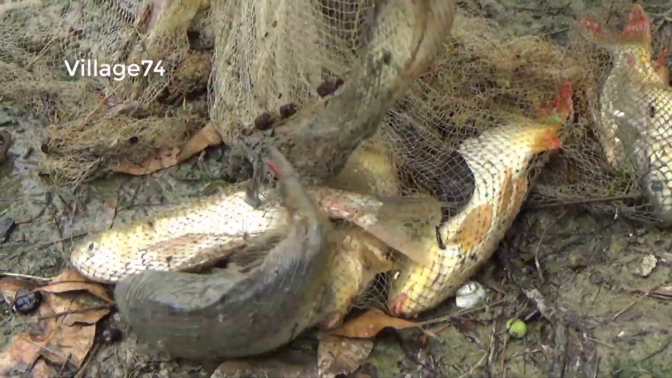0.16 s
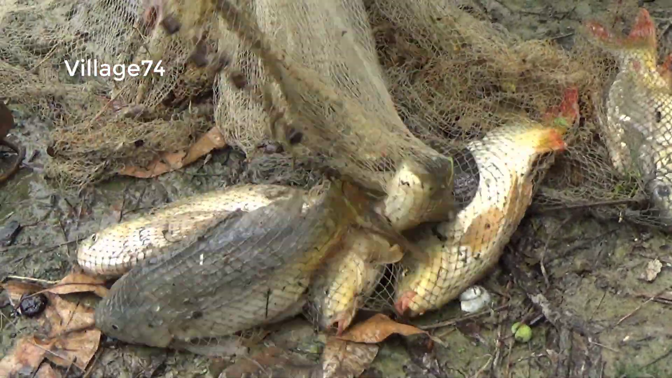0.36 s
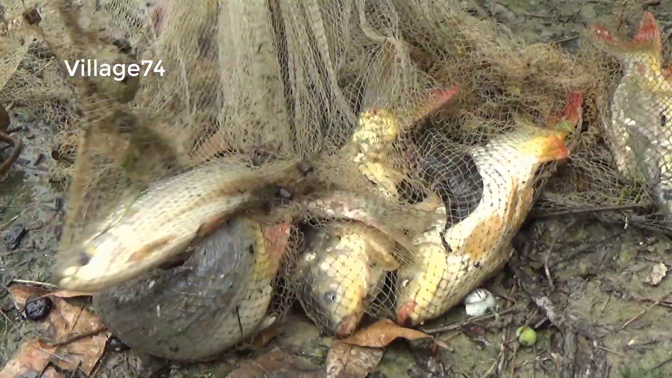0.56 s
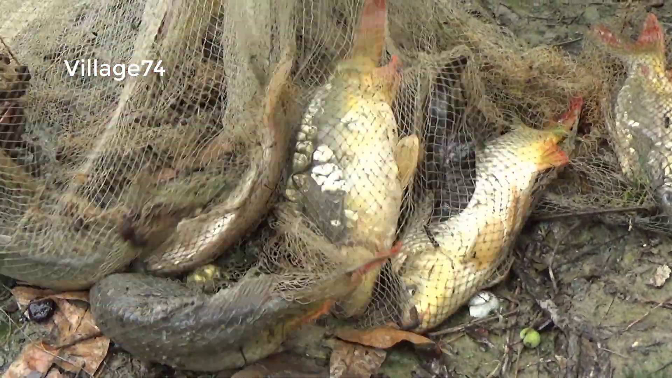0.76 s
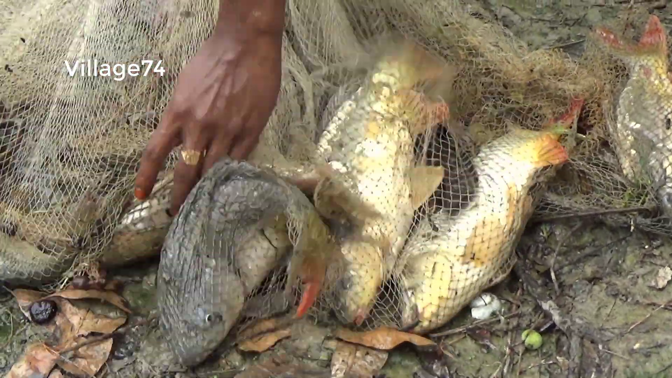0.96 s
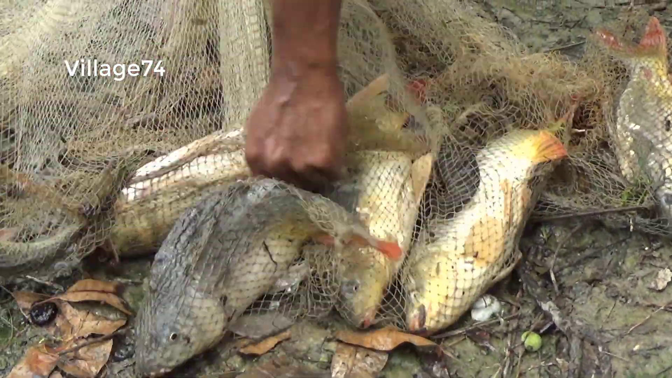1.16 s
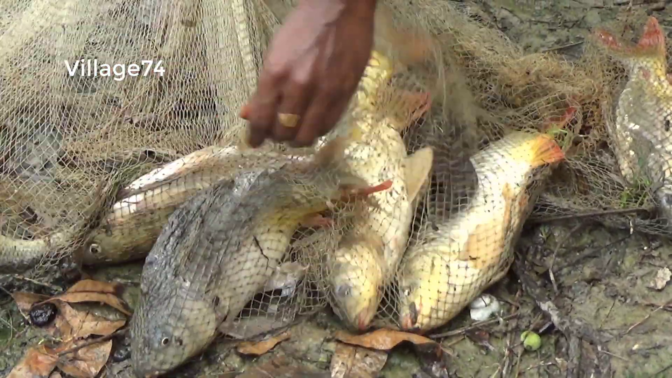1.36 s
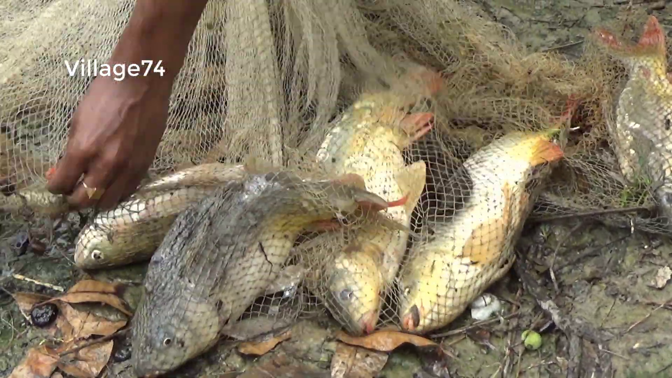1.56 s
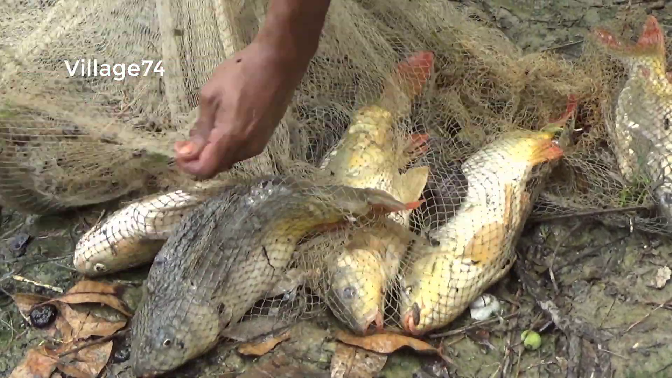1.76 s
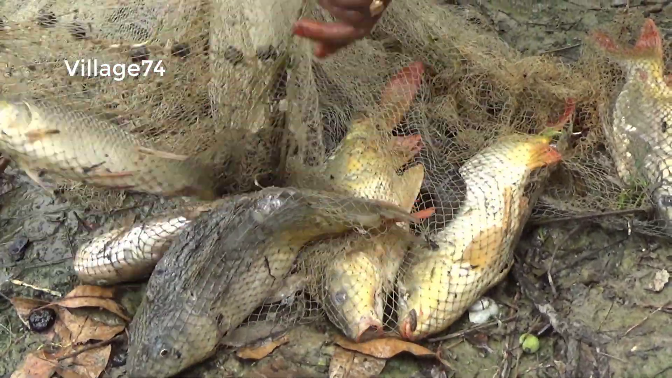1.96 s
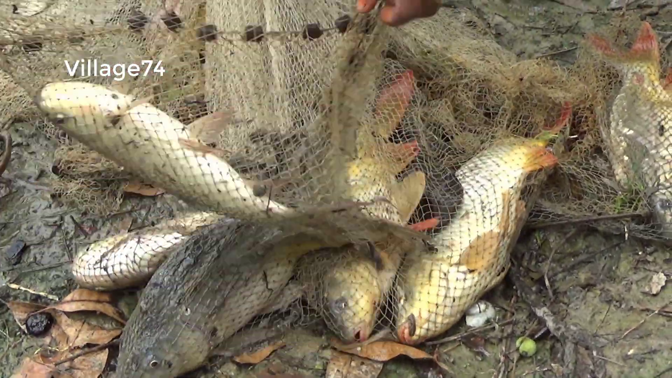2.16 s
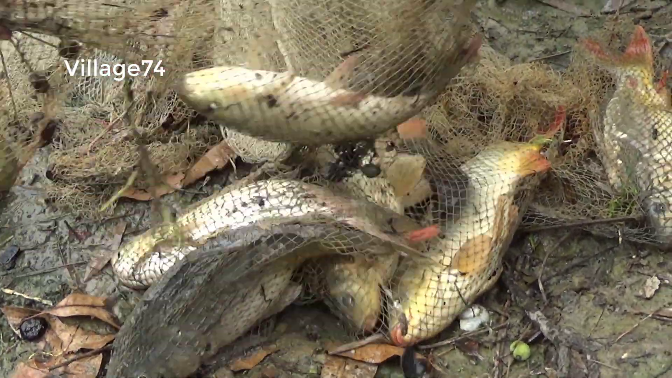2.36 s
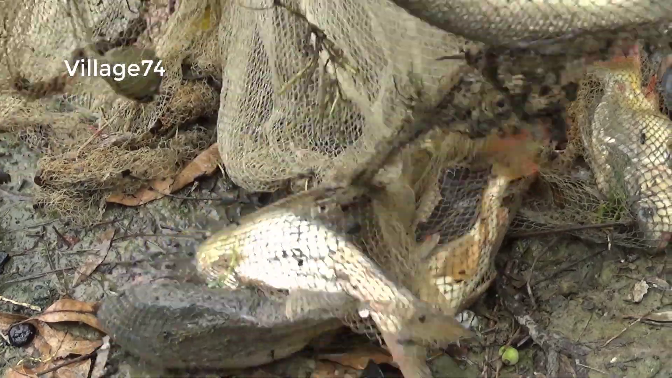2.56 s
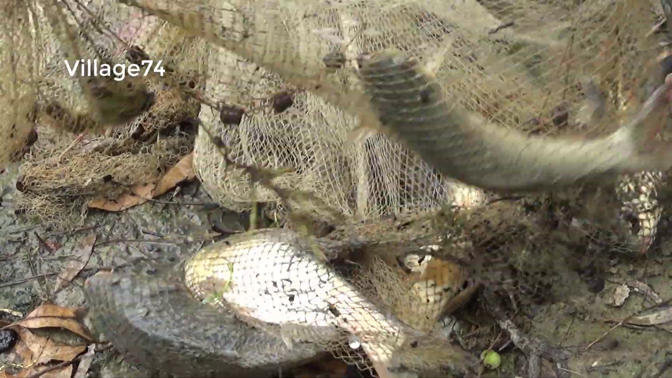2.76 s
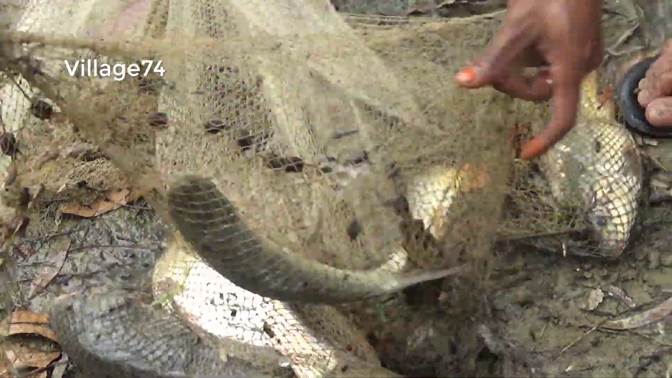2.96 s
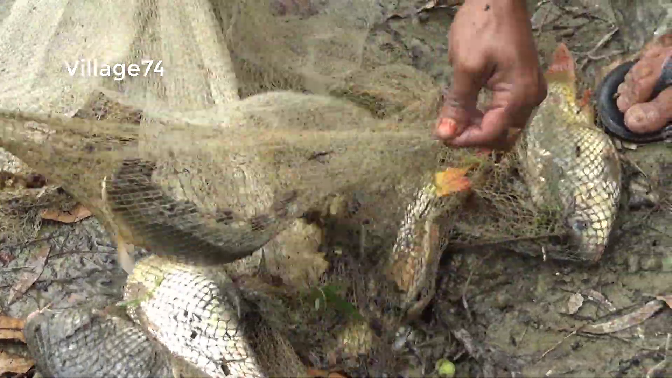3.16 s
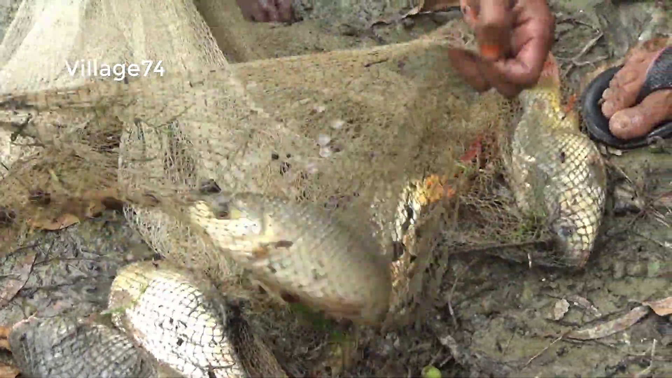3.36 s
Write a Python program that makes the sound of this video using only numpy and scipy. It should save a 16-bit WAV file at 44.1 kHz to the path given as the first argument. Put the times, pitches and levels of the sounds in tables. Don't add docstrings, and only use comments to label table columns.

```python
import sys
import numpy as np
from scipy import signal
from scipy.fft import rfft, irfft
from scipy.io import wavfile
from scipy.ndimage import uniform_filter1d

SR = 44100
rng = np.random.default_rng(int(sys.argv[2]) if len(sys.argv) > 2 else 0)


def gain_from_db(level_db):
    decades = np.asarray(level_db, float) / 20
    return 10 ** decades


def waveform_to_disk(signal):
    frames = np.transpose(np.atleast_2d(signal))
    scaled = np.clip(frames, -1, 1) * 32767
    samples = np.round(scaled).astype(np.int16)
    wavfile.write(sys.argv[1], SR, samples)


N = 152145

# (time [s], peak level [dB], centre [Hz], tail T60 [s])
SLAPS = [(0.3014, -8, 2060, 0.14), (0.3137, -10, 3780, 0.11), (0.3508, -17.5, 1840, 0.042),
         (0.4352, -23.5, 3000, 0.046), (0.5164, -20.5, 1490, 0.067), (0.6696, -9.5, 2120, 0.07),
         (0.6854, -11, 2310, 0.1), (0.6935, -11, 2110, 0.11), (0.8712, -15.5, 3100, 0.13),
         (1.092, -26, 3430, 0.042), (1.1065, -15.5, 2260, 0.039), (1.1204, -17, 3820, 0.045),
         (1.2087, -20, 1380, 0.081), (1.3689, -25.5, 2090, 0.11), (1.436, -24.5, 2880, 0.1),
         (1.538, -27.5, 2850, 0.081), (1.5465, -19, 3160, 0.028), (1.5651, -9.5, 2640, 0.046),
         (1.731, -13.5, 2480, 0.03), (2.2547, -10, 2070, 0.044), (2.3599, -23, 2680, 0.092),
         (2.3783, -22.5, 2830, 0.092), (2.507, -19, 1280, 0.076), (2.6882, -20, 1580, 0.078),
         (2.7868, -21.5, 3760, 0.039), (2.909, -19.5, 2260, 0.12), (2.9552, -22.5, 1290, 0.026),
         (3.172, -18.5, 2100, 0.047)]
SLAP_WIDTH_HZ, SLAP_TOP_DB = 1170, -5.5
# (time [s], peak level [dB], ring [Hz])
KNOCKS = [(0.111, -33.5, 826), (0.302, -18.5, 755), (0.315, -11.5, 782), (0.351, -14, 810),
          (0.486, -19, 803), (0.514, -20, 785), (0.555, -26.5, 823), (0.62, -33, 880), (0.672, -14, 776),
          (0.684, -17, 713), (0.695, -12.5, 760), (0.853, -32.5, 830), (0.887, -29, 885),
          (0.909, -29.5, 797), (1.277, -40.5, 725), (1.367, -34, 863), (1.439, -34.5, 813),
          (1.552, -26.5, 830), (1.916, -38.5, 780), (1.939, -35.5, 700), (2.223, -14, 788),
          (2.254, -15, 760), (2.382, -27, 787), (2.507, -22, 773), (2.532, -28, 804), (2.551, -28, 764),
          (2.675, -19.5, 846), (2.687, -22.5, 788), (2.699, -23.5, 813), (2.827, -33, 864),
          (2.881, -22.5, 810), (2.903, -20, 844), (2.911, -14, 808), (2.942, -19.5, 818), (2.955, -19, 843),
          (3.066, -25, 817), (3.151, -28.5, 746), (3.173, -18, 755)]
KNOCK_T60_S, KNOCK_PUSH_S = 0.055, 0.005
# (time [s], peak level [dB])
SPLATS = [(0.0103, -26.5), (0.0306, -20.5), (0.0695, -23.5), (0.2419, -7.5), (0.2847, -23), (0.3004, -7),
          (0.3156, -24), (0.351, -26), (0.3965, -15), (0.403, -11), (0.4359, -14), (0.4466, -13),
          (0.4795, -9), (0.4999, -10.5), (0.515, -8), (0.5822, -22), (0.6424, -21.5), (0.6707, -10),
          (0.6818, -8.5), (0.6848, -8), (0.7038, -10.5), (0.75, -22.5), (0.835, -21), (0.8547, -10.5),
          (0.8717, -7), (0.8754, -8.5), (0.9037, -9), (0.9248, -18), (0.9833, -24)]
# (time [s], peak level [dB])
LATE_SPLATS = [(1.0929, -13.5), (1.1075, -11), (1.121, -24), (1.191, -21), (1.2303, -23), (1.3723, -21.5),
               (1.4172, -23), (1.4383, -18.5), (1.5203, -13), (1.5469, -17), (1.5658, -18), (1.7266, -10.5),
               (2.17, -15.5), (2.1866, -27), (2.2533, -22.5), (2.5769, -18), (2.7862, -18), (2.9387, -22),
               (3.1739, -10), (3.256, -27), (3.272, -18.5)]
SPLAT_HZ, SPLAT_WIDTH_HZ, SPLAT_TAIL_DB, SPLAT_TAIL_S = 9830, 3060, -20, 0.11
SPLAT_LEAD_S, SPLAT_LEAD_DB = 0.01, -17
# (time [s], peak level [dB])
TICKS = [(0.0786, -23.5), (0.1007, -33), (.234, -19), (.2726, -23), (.292, -24), (.8, -25), (1.044, -34),
         (1.2407, -21.5), (1.3942, -33), (1.455, -27), (1.4674, -22), (1.4982, -25), (1.5676, -5),
         (1.6511, -31), (1.709, -36), (1.7485, -16.5), (2.0055, -28.5), (2.124, -30), (2.5673, -23),
         (2.604, -19), (2.772, -25), (2.9268, -31), (2.9568, -25), (3.0575, -30), (3.1315, -26),
         (3.1478, -24), (3.2804, -23.5)]
# (time [s], peak level [dB])
THUDS = [(0.235, -37), (0.49, -35), (0.655, -32), (1.108, -31), (1.41, -37.5), (1.551, -37.5), (1.721, -33),
         (2.25, -33.5), (2.39, -32), (2.436, -31), (2.687, -40.5), (2.778, -37)]
THUD_DB, THUD_HZ = 1, 255
# (time [s], level [dB])
DRAG = [
    (2.33, -55),
    (2.37, -43.5),
    (2.47, -35),
    (2.58, -40),
    (2.64, -89),
]
# (frequency [Hz], level per Hz [dB])
DRAG_COLOUR = [(100, -33), (343, -1), (424, -18), (752, -3), (1720, -8), (5080, -3.5), (10200, -10),
               (16000, -38)]
ZIP_HZ, ZIP_WIDTH_HZ, ZIP_DB = 4980, 750, -4.5
# (time [s], rustle level [dB])
STIR = [(0, -40.5), (.1, -48), (.2, -48.5), (.28, -46.5), (.44, -37.5), (.6, -44), (.77, -44.5), (.9, -40),
        (1.07, -43.5), (1.3, -50.5), (1.5, -43.5), (1.68, -50), (2.0, -50.5), (2.4, -50), (2.6, -43),
        (2.95, -51), (3.15, -44.5), (3.45, -57.5)]
# (frequency [Hz], level per Hz [dB])
MESH = [(150, -5.5), (500, -4.5), (1500, -3), (4000, -3), (6500, -7), (10000, -3), (13000, -15.5),
        (16000, -22)]
GRAINS_PER_S, GRAIN_SPREAD_DB, GRAIN_DB = 500, 5.5, -3
BODY_HZ, BODY_DB = 814, -7.5
# (chip time [s], fall time [s], level [dB])
CHIP_FALL = [(0.156, 0.277, -38.5), (0.463, 0.595, -35.5), (0.785, 0.915, -36), (1.104, 1.227, -36.5),
             (1.44, 1.57, -40), (1.756, 1.887, -38.5), (2.1, 2.217, -38), (2.423, 2.566, -37),
             (2.772, 2.916, -37), (3.141, 3.271, -37)]
# (time [s], pitch [Hz], level [dB])
CHIP = [(0, 4300, -4), (.008, 5150, 0), (.017, 5750, -2), (.021, 5780, -9)]
# (time [s], pitch [Hz], level [dB])
FALL = [(0, 3650, -6), (.014, 3400, 0), (.045, 2500, -1), (.075, 2000, -8)]
# (time [s], level [dB])
ARCHES = [(1.568, -34.5), (1.828, -33), (1.982, -33.5), (2.228, -35.5), (2.384, -31.5), (2.636, -31.5),
          (2.79, -33.5), (3.047, -36), (3.204, -34)]
# (time [s], pitch [Hz], level [dB])
ARCH = [(0, 2000, -16), (.016, 3300, -6), (.022, 4200, 0), (.036, 3950, 0), (.045, 3350, -2),
        (.062, 2500, -10)]
# (time [s], level [dB], stretch [ratio])
WHISTLES = [
    (.535, -35, 1.02),
    (.885, -34, 0.66),
]
# (time [s], pitch [Hz], level [dB])
WHISTLE = [(0, 2616, -11), (.025, 2480, -5), (.06, 2120, 1.5), (.085, 1870, -2)]
# (time [s], pitch [Hz], level [dB])
TRAIL = [(0, 1758, 2.5), (.04, 1598, -8), (.1, 1510, -3)]
TRAIL_S, TRAIL_DB = 0.95, -41
FAR_DIRECT_DB, FAR_TREES_DB, TREES_DB = -5, 1.5, -1
BOUNCE_S, BOUNCE_SHARE = 0.0012, 0.4
TREES_T60_S, NEAR_WET_DB = 0.28, -18.5
# (frequency [Hz], level per Hz [dB])
AIR = [(25, -4.5), (60, -2.5), (200, -0.5), (450, -4.5), (800, -6), (1500, -16), (3300, 1.5), (8000, -34)]
AIR_DB = -48.5
# (frequency [Hz], likeness [0-1])
LIKENESS = [(30, 1), (110, .96), (300, 0.85), (800, 0.64), (3000, 0.76), (6000, 0.93), (14000, 1)]


def unit(x):
    return x / np.sqrt(np.mean(x ** 2) + 1e-20)


def curve(rows, outside=None):
    s, *cols = np.transpose(rows)
    return [np.interp(np.arange(N) / SR, s, c, outside, outside) for c in cols]


def at_hz(points, hz):
    table_hz, value = np.transpose(points)
    return np.interp(np.log(hz), np.log(table_hz), value)


def drift(rate):
    r = np.exp(-80 * np.pi * rate / SR)
    white = rng.standard_normal(N // 40 + 2002)
    slow = signal.lfilter([1], [1, -2 * r, r * r], white)[2000:]
    return np.interp(np.arange(N) / 40, np.arange(len(slow)), unit(slow))


def peak(x, hz, width_hz):
    r = np.exp(-np.pi * width_hz / SR)
    poles = [1, -2 * r * np.cos(2 * np.pi * hz / SR), r * r]
    return signal.lfilter([(1 - r * r) / 2, 0, (r * r - 1) / 2], poles, x)


def burst(t60, rise_s):
    t = np.arange(int(0.25 * SR)) / SR
    rise = 1 - np.exp(-t / rise_s)
    return rng.standard_normal(len(t)) * rise * gain_from_db(-60 * t / max(t60, 0.003))


def sputter(count, depth_db, size):
    return gain_from_db(depth_db * unit(uniform_filter1d(rng.standard_normal(count), size=size)))


def add(out, s, x, db, pan_db=0.):
    i = max(int(s * SR), 0)
    x = x[:N - i] * gain_from_db(db) / np.max(abs(x))
    out[:, i:i + len(x)] += x * gain_from_db(np.array([[pan_db / 2], [-pan_db / 2]]))


def grains(per_s, spread_db):
    sizes = gain_from_db(spread_db * np.minimum(rng.exponential(1, N), 4.5))
    hits = sizes * (rng.random(N) < per_s * gain_from_db(4.0 * drift(25.0)) / SR)
    return unit(signal.lfilter([1], [1, -0.96], hits) * rng.standard_normal((2, N)))


def colour(white, spectrum, patchy_db):
    f = np.arange(N // 2 + 1) * SR / N + 1
    mid, side = rfft(white) * gain_from_db(at_hz(spectrum, f))
    alike = np.clip(at_hz(LIKENESS, f), 0, 1)
    both = np.sqrt(1 + alike) * mid + np.sqrt(1 - alike) * side * [[1], [-1]]
    octave = np.clip(np.log2(f / 31.25), 0, 9)
    out = 0
    for k in np.arange(10):
        share = np.clip(1 - abs(octave - k), 0, 1)
        out = out + irfft(both * share, N) * gain_from_db(patchy_db * drift(16.8))
    return out


def slaps():
    out = np.zeros((2, N))
    for s, db, hz, tail_s in SLAPS:
        tail = burst(tail_s, 0.0011)
        crack = burst(0.025, 0.00041)
        hit = crack + gain_from_db(-6.5) * tail * sputter(len(tail), 6.55, 60)
        x = peak(peak(hit, hz, SLAP_WIDTH_HZ), hz, 2 * SLAP_WIDTH_HZ)
        x = x + gain_from_db(SLAP_TOP_DB) * peak(hit, 3400, 4400) + gain_from_db(1) * peak(hit, 1960, 1120)
        add(out, s, x, db + 1.0, rng.normal(2.6, 1.0))
    return out


def knocks():
    out = np.zeros((2, N))
    width = 3.02 / KNOCK_T60_S
    for s, db, hz in KNOCKS:
        push = burst(KNOCK_PUSH_S * 6, 0.00029)
        high = 0.19 * peak(push, hz * 1.112, 2 * width)
        low = 0.14 * peak(push, hz * 0.745, 2 * width)
        ring = peak(push, hz, width) + high - low
        add(out, s - 0.001, peak(ring, hz, 570), db, 1.2)
    return out


def splats():
    out, lead = np.zeros((2, N)), int(SPLAT_LEAD_S * SR)
    for s, db in list(SPLATS) + list(LATE_SPLATS):
        hit = burst(0.01, 0.00032) + 0.25 * burst(0.018, 0.0024)
        wash = gain_from_db(SPLAT_TAIL_DB) * burst(SPLAT_TAIL_S, 0.0095)
        run_up = gain_from_db(SPLAT_LEAD_DB) * burst(0.03, 0.0001)[lead:0:-1]
        spray = np.r_[run_up, hit + wash]
        spray = spray * sputter(len(spray), 4.8, 30)
        hz = SPLAT_HZ * rng.uniform(0.89, 1.0)
        bright = peak(peak(spray, hz, SPLAT_WIDTH_HZ), hz * 0.4, 8700)
        add(out, s - SPLAT_LEAD_S, bright, db, rng.normal(0, 1.0))
    return out


def ticks():
    out = np.zeros((2, N))
    for s, db in TICKS:
        tick = peak(burst(0.01, 0.00017), SPLAT_HZ * rng.uniform(0.61, 1.04), 2800)
        add(out, s, peak(tick, SPLAT_HZ, 7700), db, rng.normal(0, 1.0))
    return out


def thuds():
    out = np.zeros((2, N))
    for s, db in THUDS:
        add(out, s, peak(burst(0.11, 0.0046), THUD_HZ, 220), db + THUD_DB)
    return out


def drag():
    db, = curve(DRAG, outside=-120)
    white = 0.74 * grains(1500.0, 1.6) + rng.standard_normal((2, N))
    scrape = white[0]
    strands = peak(scrape, ZIP_HZ, ZIP_WIDTH_HZ) + 0.6 * peak(scrape, ZIP_HZ * 1.9, 2 * ZIP_WIDTH_HZ)
    strands = strands + 1.1 * peak(scrape, 1190, 270)
    zip_gain = gain_from_db(ZIP_DB + 1.1 * (db - db.max()))
    slide = unit(colour(white, DRAG_COLOUR, patchy_db=1.0))
    return gain_from_db(db + 4.5) * (slide + zip_gain * unit(strands))


def mesh():
    db, = curve(STIR)
    low_db = -4.0 + 0.4 * (db - db.mean())
    wet = gain_from_db(GRAIN_DB) * grains(GRAINS_PER_S, GRAIN_SPREAD_DB)
    rustle = unit(colour(wet + 0.91 * rng.standard_normal((2, N)), MESH, patchy_db=3))
    low = signal.sosfilt(signal.butter(2, 3500, fs=SR, output="sos"), rustle)
    rubs = grains(300.0, 2.2)[0]
    body = gain_from_db(BODY_DB) * unit(peak(peak(rubs, BODY_HZ, 150), BODY_HZ, 280))
    return gain_from_db(db + 2.5) * (rustle - low + gain_from_db(low_db) * (low + body))


def note(shape, stretch=0.98):
    s, hz, db = np.transpose(shape)
    t = np.arange(int(s[-1] * stretch * SR)) / SR / stretch
    edge = np.clip(np.minimum(t, s[-1] - t) / 0.003, 0, 1)
    flutter = sputter(len(t), 2.43, 250)
    pitch = np.interp(t, s, hz) * rng.normal(1, 0.0056)
    return np.sin(2 * np.pi * np.cumsum(pitch) / SR) * gain_from_db(np.interp(t, s, db)) * flutter * edge


def birds():
    near, far = np.zeros((2, 2, N))
    for chip_s, fall_s, db in CHIP_FALL:
        add(far, chip_s, note(CHIP), db - 1.0, 3.0)
        add(far, fall_s, note(FALL), db, 3.0)
    for s, db in ARCHES:
        add(near, s, note(ARCH), db, 4.0)
    for s, db, stretch in WHISTLES:
        add(near, s, note(WHISTLE, stretch), db, 4.0)
    add(near, TRAIL_S, note(TRAIL), TRAIL_DB, 4.0)
    direct = near + gain_from_db(FAR_DIRECT_DB) * far
    bounce = BOUNCE_SHARE * np.roll(direct, int(BOUNCE_S * SR), axis=1)
    return direct + bounce + trees(gain_from_db(TREES_DB) * near + gain_from_db(FAR_TREES_DB) * far)


def trees(x):
    t = np.arange(int(0.8 * SR)) / SR
    tail = rng.standard_normal((3, len(t))) * gain_from_db(-60 * t / TREES_T60_S) * (t > 0.006)
    tail = (tail[0] + 0.88 * tail[1:]) / np.sqrt(np.sum(tail[0] ** 2) * 0.77)
    return signal.fftconvolve(x.mean(axis=0, keepdims=True), tail, axes=1)[:, :N]


def air():
    return gain_from_db(AIR_DB) * unit(colour(rng.standard_normal((2, N)), AIR, patchy_db=4.0))


def scene():
    fish = knocks() + thuds() + slaps() + splats() + ticks()
    hum = air()
    echoes = gain_from_db(NEAR_WET_DB) * trees(fish)
    return fish + echoes + mesh() + drag() + birds() + hum


def band_limit(x):
    return signal.sosfilt(signal.butter(12, 16470, fs=SR, output="sos"), x)


def record(dry):
    mix = signal.sosfilt(signal.cheby2(10, 60, 16500, fs=SR, output="sos"), dry)
    return band_limit(mix)


dry = scene()
out = record(dry)
waveform_to_disk(out)
```